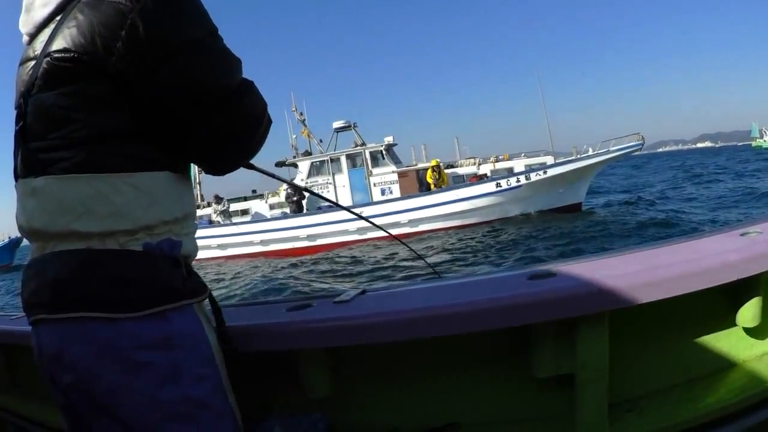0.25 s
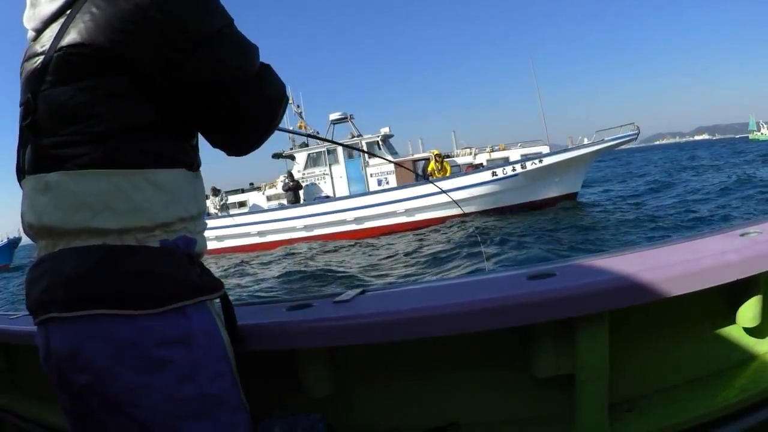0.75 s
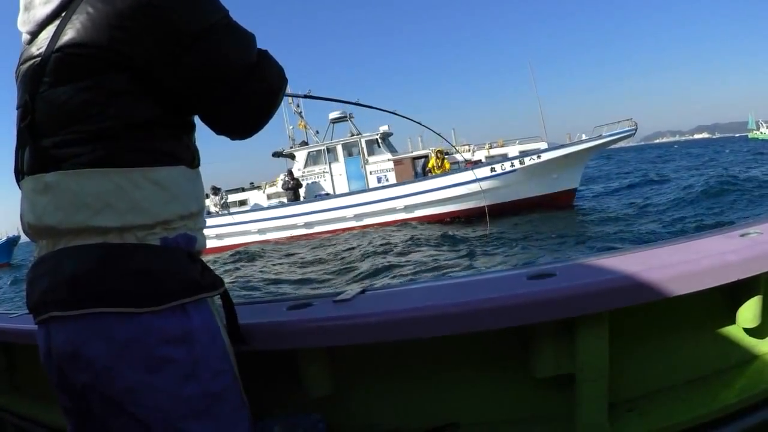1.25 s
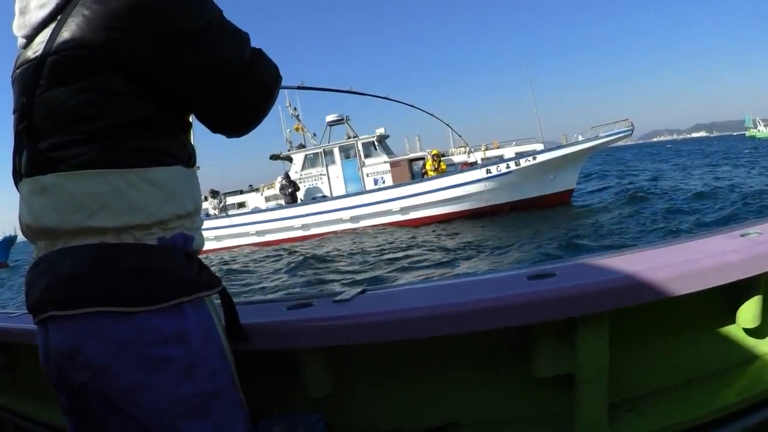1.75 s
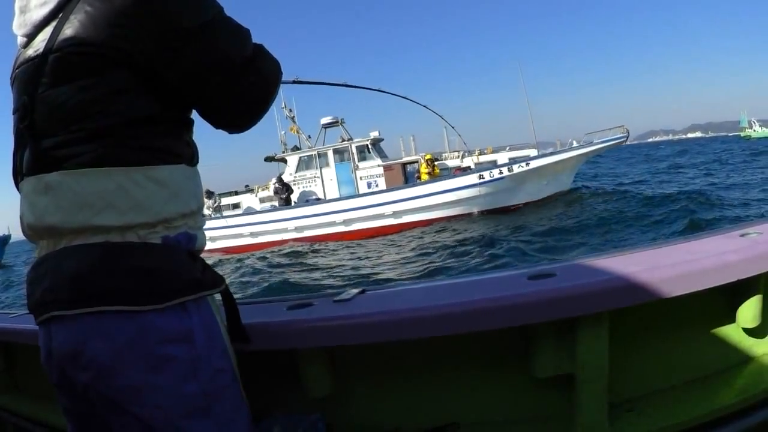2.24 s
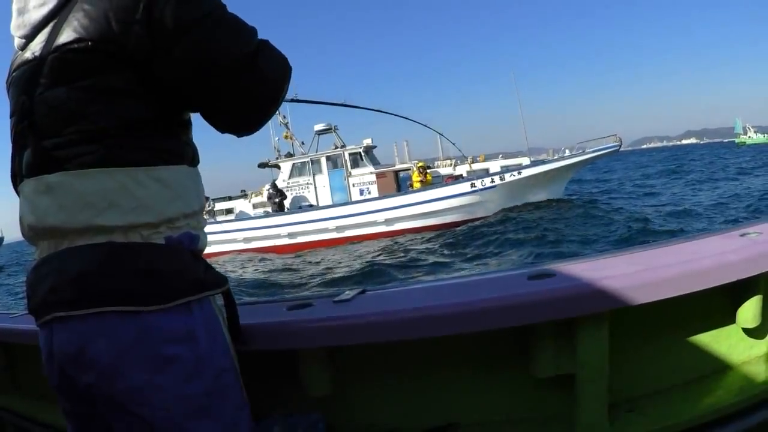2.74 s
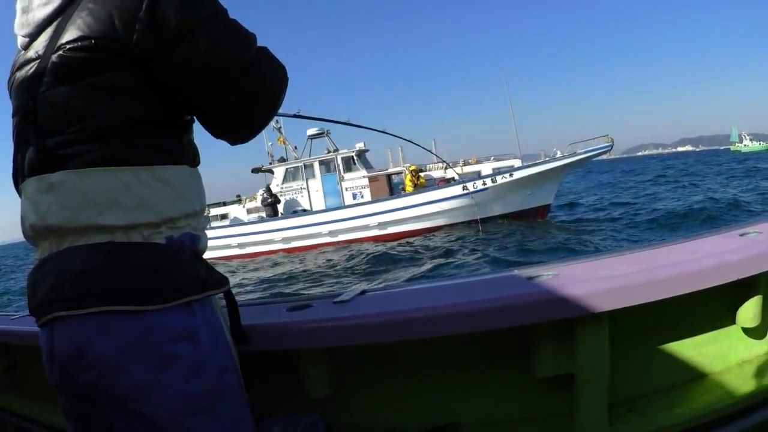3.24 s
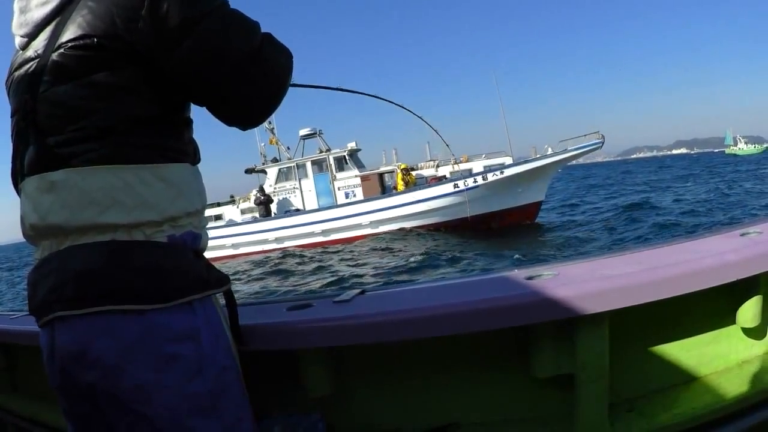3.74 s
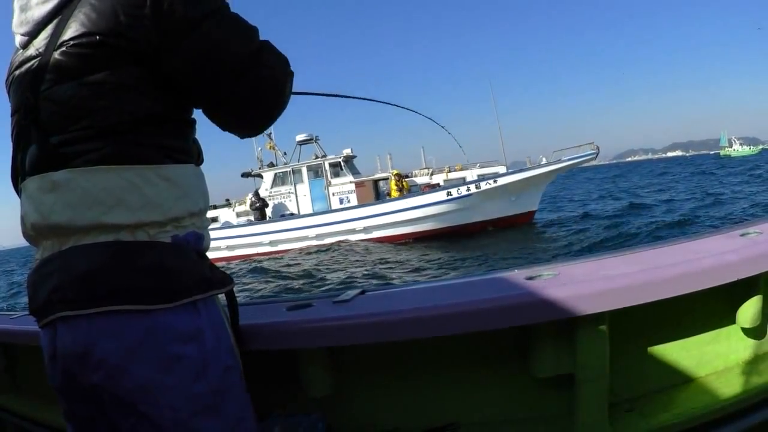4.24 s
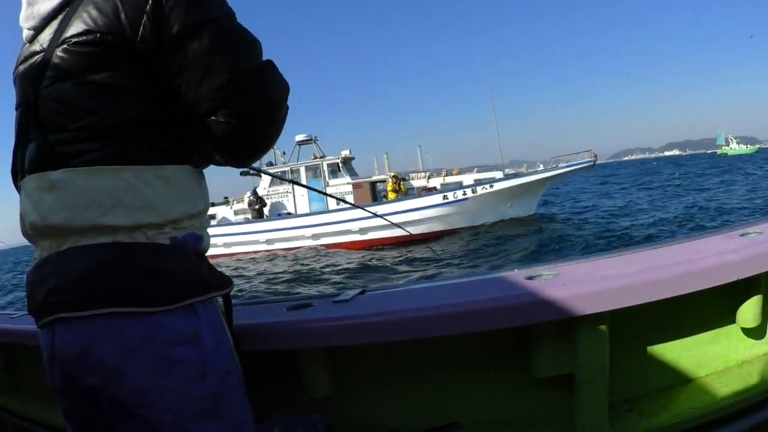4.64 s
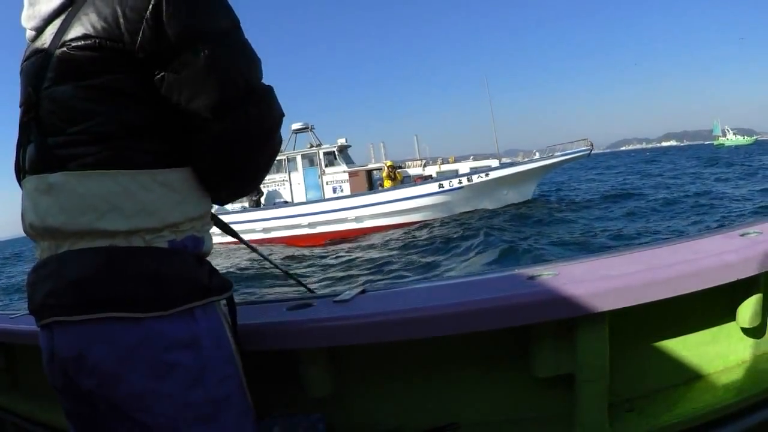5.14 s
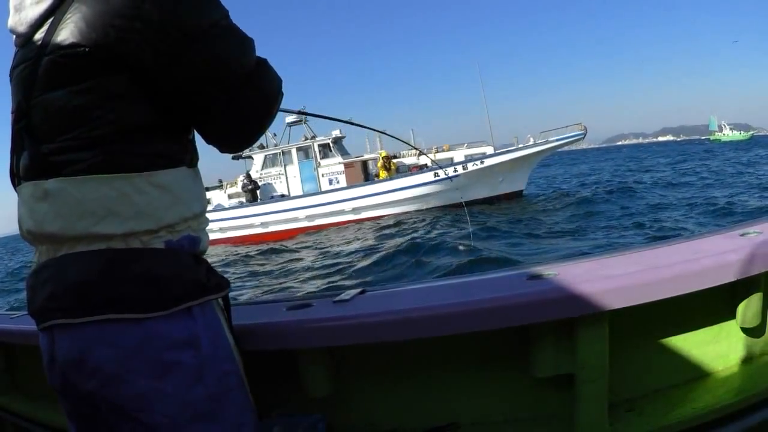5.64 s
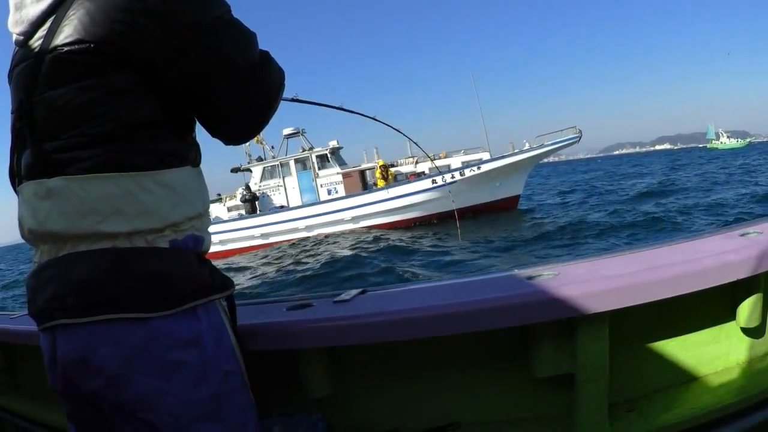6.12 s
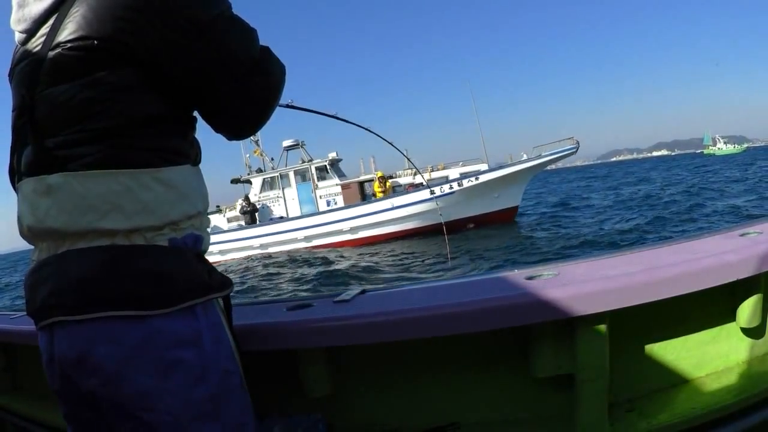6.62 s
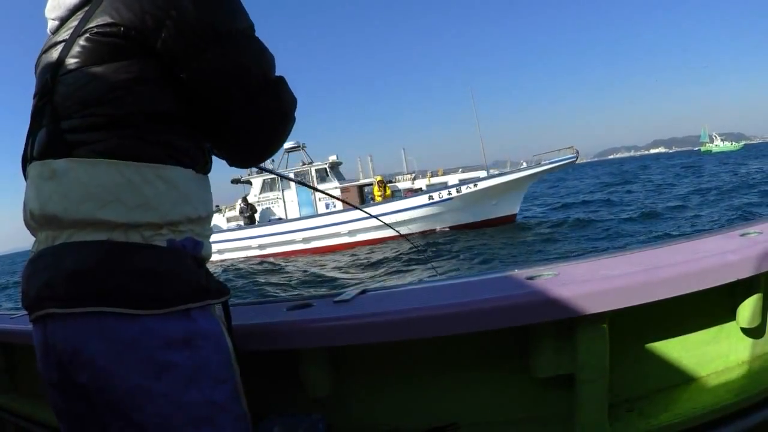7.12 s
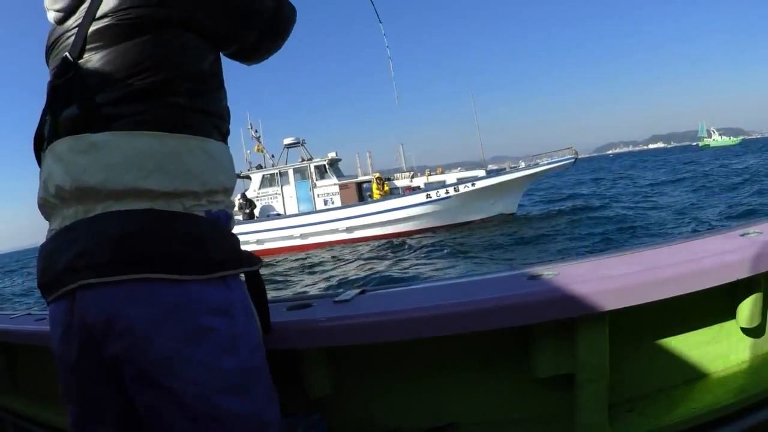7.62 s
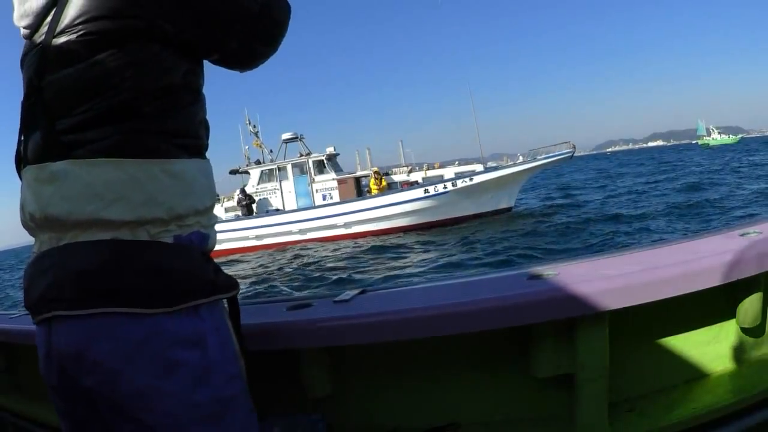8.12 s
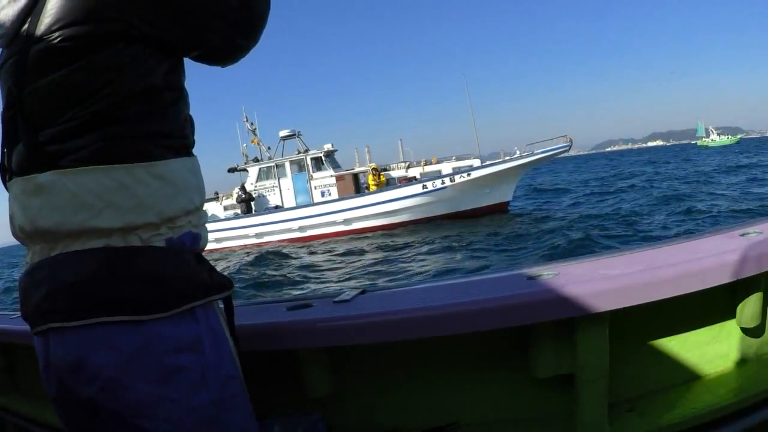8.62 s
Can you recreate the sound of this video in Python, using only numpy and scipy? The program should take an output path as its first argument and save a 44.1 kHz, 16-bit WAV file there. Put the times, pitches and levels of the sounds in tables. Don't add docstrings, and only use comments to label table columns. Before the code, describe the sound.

A small boat's diesel throbs low and muffled under load, then revs slightly higher and lighter, with sharp tackle snaps, ticks and a thin late whine.

```python
import sys
import numpy as np
from scipy import signal
from scipy.io import wavfile
from scipy.ndimage import uniform_filter1d

SR = 44100
rng = np.random.default_rng(int(sys.argv[2]) if len(sys.argv) > 2 else 0)


def makeup_ratio(level_db):
    decades = np.asarray(level_db, float) / 20
    return 10 ** decades


def put_to_file(sound):
    columns = np.atleast_2d(sound).T
    safe = np.clip(columns, -1, 1)
    whole_steps = np.round(safe * 32767)
    wavfile.write(sys.argv[1], SR, whole_steps.astype(np.int16))


N = 391166
T = np.arange(N) / SR

# t/s, firing rate f/Hz, load 0-1
SPEED = [
    (0, 22.39, 0.73),
    (3.66, 22.47, 0.73),
    (3.98, 25.97, 0.07),
    (4.3, 25.9, 0.04),
    (8.3, 25.91, 0.),
    (8.87, 24.46, 0.32),
]
# t/s, surge level/dB
SURGE = [(0, 0), (1.0, 1.5), (1.42, -1), (1.65, -1), (2.0, 0), (3.5, .5), (3.85, 1), (4.2, 2), (4.5, 0.5),
         (5.2, 2.5), (5.7, 0.5), (6.4, 0), (6.8, -2), (7.3, 1), (7.6, -3), (8.0, .5), (8.87, -.5)]


def evened(x):
    return x / np.sqrt(np.mean(x ** 2) + 1e-20)


def read(points, hz):
    f, value = np.transpose(points)
    return np.interp(np.log(hz + 1), np.log(f + 1), value)


def curves(rows, t, outside=None):
    s, *columns = np.transpose(rows)
    return [np.interp(t, s, c, outside, outside) for c in columns]


def add(mix, s, sound):
    part = mix[round(s * SR):][:len(sound)]
    part += sound[:len(part)]


def drift(top_hz, t):
    rate_hz = 120
    steps = rng.standard_normal(round(N / SR * rate_hz) + 2)
    slow = signal.lfilter([1], [1, -np.exp(-2 * np.pi * top_hz / rate_hz)], steps)
    return np.interp(t * rate_hz, np.arange(len(slow)), evened(slow))


def tone(t, hz, db, waver_db=2.5, wander_hz=.4, top_hz=3):
    turns = np.cumsum(hz + wander_hz * drift(top_hz, t)) * (t[1] - t[0]) + rng.random()
    level = makeup_ratio(db + waver_db * drift(top_hz, t))
    return np.sqrt(2) * level * np.sin(2 * np.pi * turns)


def tuned(hz, centre_hz, width_hz, top_db):
    return top_db - 10 * np.log10(1 + ((hz - centre_hz) / width_hz) ** 2)


def colour(x, points):
    hz = abs(np.fft.fftfreq(4096, 1 / SR))
    log_gain = np.log(makeup_ratio(read([(1500, -69.0)] + points, hz)))
    taps = np.fft.ifft(np.exp(np.conj(signal.hilbert(log_gain)))).real[:1024]
    return signal.oaconvolve(x, taps / np.linalg.norm(taps))[:N]


def band(x, lo_hz, hi_hz):
    return signal.sosfilt(signal.butter(2, [lo_hz, hi_hz], "band", fs=SR, output="sos"), x)


def treble():
    # f/Hz, level per Hz/dB
    case_colour = [(3600, -15), (4300, -12), (4950, -3.5), (5700, -16.5), (6200, -6), (7100, 2.5),
                   (8400, -14.5), (9000, -8), (10000, -19), (11000, -12.5), (12300, -13), (13200, -25.5),
                   (14300, -13), (15700, -13)]
    # f/Hz, level per Hz/dB
    air_colour = [(2000, 6.5), (2700, 1.5), (3700, -5), (4450, -16), (4950, -16.5), (6200, -15),
                  (7150, -2.5), (8400, -25.5), (9050, -7.5), (10000, -27.5), (10700, -15), (12000, -20.5),
                  (13200, -32.5), (15000, -21)]
    # t/s, level/dB, half length/s
    sheet = (7.47, -35, .045)
    # t/s, peak level/dB, top band relative level/dB, t60/s
    ticks = [(0.1082, -37, -22, 0.12), (1.542, -29.5, -24, 0.091), (1.6003, -37, -12.5, 0.09),
             (1.8928, -34.5, -22, 0.083), (1.9247, -37, -8, 0.09), (1.9679, -39.5, -19.5, 0.09),
             (2.176, -43, 5, 0.09), (2.2493, -36, -18.5, 0.09), (2.3032, -42, -21, 0.11),
             (2.4034, -38, -22, 0.092), (2.7367, -35, -22, 0.083), (3.2306, -43, -14, 0.09),
             (3.27, -39, -21, 0.14), (3.3377, -42, -11, 0.09), (3.3982, -44, -17, 0.095),
             (4.5695, -44, -26, 0.15), (4.605, -35.5, -20.5, 0.098), (6.2188, -32.5, -16.5, 0.09),
             (6.7256, -39, -13, 0.095), (6.7994, -36, -13.5, 0.09), (7.1876, -39, -17, 0.09),
             (8.4224, -28.5, -28, 0.085), (8.4394, -33, -23.5, 0.093)]
    spray_db, air_db, air_start_s, air_rise_s = -58, -47.5, 4.74, 0.63

    spray, air = rng.standard_normal((2, N)) * makeup_ratio(3.0 + 1.5 * drift(7.9, T))
    air *= makeup_ratio(air_db) * (1 - np.exp(-(np.maximum(T - air_start_s, 0) / air_rise_s) ** 2))
    s, db, half_s = sheet
    splash = makeup_ratio(db) * np.exp(-((T - s) / half_s) ** 2 / 2) * band(rng.standard_normal(N), 6300, 17000)
    drive = makeup_ratio(spray_db) * spray + makeup_ratio(-12.5) * air

    dull, bright, t = np.zeros(N), np.zeros(N), T[:6000]
    for s, db, top_db, t60 in ticks:
        snap = np.minimum(t / 0.00089, 1) * makeup_ratio(-60 * t / .02)
        ring = np.minimum(t / .002, 1) * makeup_ratio(-60 * t / abs(t60))
        add(dull, s - .001, makeup_ratio(db) * 0.51 * ring * rng.standard_normal(len(t)))
        add(bright, s, makeup_ratio(db + top_db) * 2.2 * snap * rng.standard_normal(len(t)))
    drive += band(dull, 5900, 8300) + band(bright, 8600, 13500)
    return colour(drive, case_colour) + makeup_ratio(2.5) * colour(air + splash, air_colour)


def knocks():
    # t/s, peak level/dB, f/Hz, t60/s, roughness (0 clean, 1 noise)
    struck = [(0.75, -26, 1864, 0.55, .1), (1.43, -10.5, 171, 0.048, 0.2), (1.462, 5, 228, 0.048, 0.1),
              (1.463, -11.5, 700, 0.024, 0), (3.398, -35, 2870, 0.098, 1.23),
              (3.722, -12, 1003, 0.29, 1.04), (3.725, -18.5, 1437, 0.18, 0.6),
              (5.1, -10.5, 192.3, 0.76, 0.7), (6.12, -31, 3020, 0.11, 0.43), (8.423, -30, 3080, 0.081, 0.9),
              (8.442, -22.5, 2590, 0.092, 1.2), (8.463, -27, 2500, 0.022, 0.9)]
    # (f/Hz, level/dB, t60/s)
    tackle = [
        (3.657, -12.5, [(5000, -23, 0.03), (7500, -2, 0.021), (7100, -16, 0.11), (8800, -5, 0.01), (12400, -15, 0.013), (15500, -7.5, .009)]),
        (4.1624, -15.5, [(4700, -22, 0.04), (7200, -19, .02), (8520, -17, .008), (10300, -6.5, 0.0057), (11630, -15.5, .008), (14200, 2, .007), (15400, -7, .01)]),
    ]

    rings = list(struck)
    for s, db, modes in tackle:
        for hz, rel_db, t60 in modes:
            rings.append((s, db + rel_db, hz, t60, min(.15 + 25 * t60, 1)))
    out, t = np.zeros(N), T[:9000]
    for s, db, hz, t60, rough in rings:
        window = np.hanning(round(14 + 2.5 * SR / hz))
        smear = evened(signal.oaconvolve(rng.standard_normal(len(t)), window, "same"))
        ring = (1 - rough + rough * smear) * np.sin(2 * np.pi * hz * t)
        attack = np.minimum(t / (0.00078 + 0.66 / hz), 1)
        add(out, s, makeup_ratio(db - 60 * t / t60) * attack * ring)
    return out


def whines():
    # t/s, f/Hz
    blower = [(5.0, 2604), (5.19, 3490), (5.5, 3360), (5.68, 3435), (6.05, 3475), (6.45, 3415), (6.8, 3478),
              (7.05, 3447), (7.5, 3517), (8.06, 3546), (8.3, 3500), (8.65, 3506), (8.87, 3450)]
    # f/Hz, width/Hz, rms level/dB
    duct = (3220, 150, -46.5)
    # multiple of the whine, level on the blade tone/dB, wander/Hz
    overtones = [(2.057, -0.5, 6.2), (3.06, -21, 25)]
    # start t/s, length/s, edge/s, f/Hz, rms level/dB
    whistle = (5.55, 1.7, .25, 2265, -45)
    blade_start_db, blade_db_per_s, rise_s = -62.5, 2.5, 0.38

    out, t = np.zeros(N), T[T >= blower[0][0]]
    hz = curves(blower, t)[0]
    blade_db = blade_start_db + blade_db_per_s * (t - t[0])
    line = tone(t, hz, tuned(hz, *duct), waver_db=1.2, wander_hz=4, top_hz=30)
    for k, rel_db, wander_hz in overtones:
        line += tone(t, k * hz, blade_db + rel_db, waver_db=5.5, wander_hz=wander_hz, top_hz=49.94)
    line *= np.minimum((t - t[0]) / rise_s, 1) ** 2
    s, length_s, edge_s, f, db = whistle
    blown = np.clip(np.minimum(t - s, s + length_s - t) / edge_s, 0, 1)
    add(out, t[0], line + blown * tone(t, f, db, waver_db=2.2, wander_hz=16, top_hz=10))
    return out


def roar():
    # f/Hz, level per Hz/dB
    loaded = [(15, -54), (25, -18.5), (70, -11), (96, -6.5), (145, 2), (207, 1), (335, -7.5), (391, -11),
              (436, -14), (568, -9), (648, -14), (756, -7.5), (882, -14), (1860, -27.5), (4800, -57),
              (6240, -90), (10600, -120)]
    # f/Hz, level per Hz/dB
    free = [(22, -24), (53, -9.5), (88, -1.5), (127, 2.5), (300, -2), (345, -10), (540, -10), (600, -12.5),
            (730, -10.5), (830, -15), (1250, -16), (2220, -25), (3300, -40), (4800, -81)]
    # level in gear/dB, level out of gear/dB, share of the surge
    layers = [
        (-19, -22, 0.96),
        (-18, -22, 0.33),
        (-25.5, -30, 0.23),
    ]

    size, hop = 2048, 512
    frames, hz = N // hop + 5, np.fft.rfftfreq(size, 1 / SR)
    t = np.arange(frames) * hop / SR
    a, b, patches = rng.standard_normal((frames, len(hz), 3)).T
    patches = evened(uniform_filter1d(uniform_filter1d(patches, 6, 0), 5, 1))
    load = np.clip(curves(SPEED, t)[1], 0, 1)
    surge_db = curves(SURGE, t)[0]
    shape = load * read(loaded, hz)[:, None] + (1 - load) * read(free, hz)[:, None]
    z = (a + 1j * b) * makeup_ratio(shape + 0.55 * patches) * (hz < 5400)[:, None]

    centres_hz, edges_hz = [180, 570, 1700], [(100, 320), (320, 1000), (1000, 3000)]
    trim_db = 0
    for (on_db, off_db, share), (lo, hi), one in zip(layers, edges_hz, np.eye(3)):
        wanted_db = off_db + (on_db - off_db) * load / load[0] + share * surge_db
        inside = (hz >= lo) & (hz < hi)
        power = 2 * (makeup_ratio(shape[inside]) ** 2).sum(0) / 3
        weight = read(list(zip(centres_hz, one)), hz)[:, None]
        trim_db = trim_db + weight * (wanted_db - 10 * np.log10(power))
    noise = signal.istft(z * makeup_ratio(trim_db), nperseg=size, noverlap=size - hop)[1][:N]

    phase = 2 * np.pi * np.cumsum(curves(SPEED, T)[0]) / SR
    throb_db = 0.63 * np.cos(phase) + 0.18 * np.cos(2 * phase + 1) + 0.24 * drift(25, T)
    return noise * makeup_ratio(throb_db)


def engine():
    # multiple of the firing rate, rms level in gear/dB, rms level out of gear/dB
    orders = [(1, -43, -52), (1.5, -53.5, -52.5), (2, -38.5, -33.5), (2.5, -37, -42.5), (3, -32, -44.5),
              (4, -39.5, -39.5), (5, -34, -36), (6, -33.5, -40), (7, -36.5, -48.5), (8, -39, -34),
              (9, -41.5, -36), (11, -40.5, -39), (12, -42.5, -36)]
    # f/Hz, rms level/dB
    gear_tops = [(393, -34.5), (590, -35.5), (746, -33)]
    # f/Hz, rms level/dB
    neighbour = [(31, -57), (81.3, -31.5)]
    # f/Hz, width/Hz, rms level/dB
    pipe = (51.9, 1, -29)
    # f in gear/Hz, f out of gear/Hz, rms level in gear/dB, rms level out of gear/dB, wander/Hz
    hums = [
        (197, 250, -30, -64, 1.57),
        (131, 126.5, -28, -28.5, 2.45),
        (158, 210, -28.5, -63, 2.1),
    ]
    # middle t/s, half length/s, f/Hz, rms level/dB
    sings = [(0.397, 0.26, 196.5, -26.5), (.7, 0.19, 146, -25), (1.304, 0.26, 158, -22.5),
             (1.298, .12, 197, -25.5), (1.3, 0.25, 132, -24), (1.833, 0.063, 199, -17),
             (3.257, .28, 157.5, -22.5), (3.3, 0.23, 199, -28), (4.6, 0.31, 128, -22.5),
             (6.4, 0.13, 125, -23.5), (8.002, 0.33, 127, -27.5), (4.1, 0.044, 51.6, -20),
             (4.9, 0.32, 51.9, -29), (6.25, 0.22, 52, -22), (7.197, 0.13, 81, -24)]

    step = 16
    t = T[::step]
    hz, load = curves(SPEED, t)
    load, surge_db = np.clip(load, 0, 1), curves(SURGE, t)[0]
    out = np.zeros(len(t))
    for k, on_db, off_db in orders:
        out += tone(t, k * hz, load * on_db + (1 - load) * off_db, wander_hz=0.123 * k)
    for f, db in gear_tops:
        out += load * tone(t, f, db, waver_db=5.0, wander_hz=2.42)
    for f, db in neighbour:
        out += tone(t, f, db - 5 * load, waver_db=4, wander_hz=0.82)
    out += tone(t, 2 * hz, tuned(2 * hz, *pipe), waver_db=3.5, wander_hz=0.16, top_hz=4.5)
    geared = np.clip(load / load[0], 0, 1)
    for on_hz, off_hz, on_db, off_db, wander_hz in hums:
        db = off_db + (on_db - off_db) * geared + 1.2 * surge_db
        out += tone(t, off_hz + (on_hz - off_hz) * geared, db, waver_db=3, wander_hz=wander_hz)
    for s, half_s, f, db in sings:
        swell = np.exp(-((t - s) / half_s) ** 2 / 2)
        out += swell * tone(t, f, db, waver_db=1.4, wander_hz=0.51)
    return signal.resample_poly(out, step, 1)[:N]


def scene():
    mono = treble() + knocks() + whines() + roar() + engine()
    bass = signal.butter(2, 480, fs=SR, output="sos")
    top = signal.butter(4, 11000, "high", fs=SR, output="sos")
    side = makeup_ratio(-26.0) * signal.sosfilt(bass, mono)
    side += makeup_ratio(-71) * signal.sosfilt(top, rng.standard_normal(N))
    return np.array([mono - side, mono + side])


def band_limit(x):
    return signal.sosfilt(signal.butter(12, 15730, fs=SR, output="sos"), x)


def record(dry):
    # f/Hz, width/Hz
    notches = [(5690, 450), (4550, 130)]
    # t/s, depth/dB, fall/s, recovery/s
    ducks = [
        (3.658, 12.5, 0.0049, 0.044),
        (4.163, 8, 0.0034, 0.063),
        (7.449, 0, 0.083, 0.26),
        (8.43, 9.5, 0.024, 0.093),
    ]

    x = dry
    for hz, width_hz in notches:
        x = signal.lfilter(*signal.iirnotch(hz, hz / width_hz, SR), x)
    duck_db, t = np.zeros(N), T[:SR]
    for s, depth_db, fall_s, back_s in ducks:
        add(duck_db, s, depth_db * (1 - np.exp(-t / fall_s)) * np.exp(-(t / back_s) ** 0.73))
    return band_limit(np.clip(x / makeup_ratio(duck_db), -.98, .98))


dry = scene()
out = record(dry)
put_to_file(out)
```